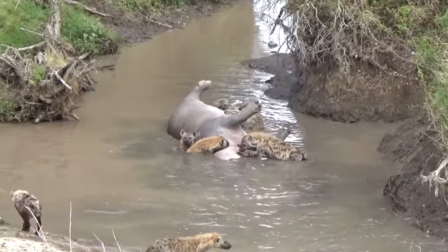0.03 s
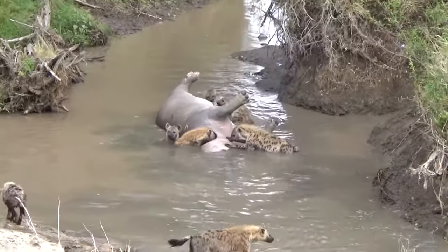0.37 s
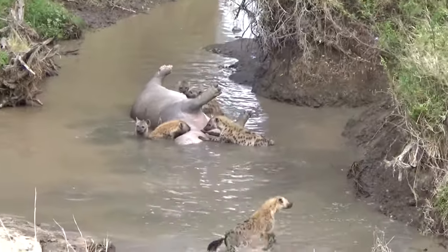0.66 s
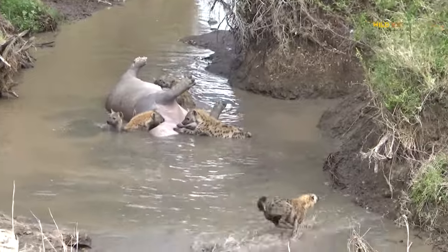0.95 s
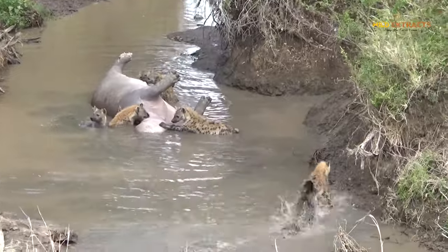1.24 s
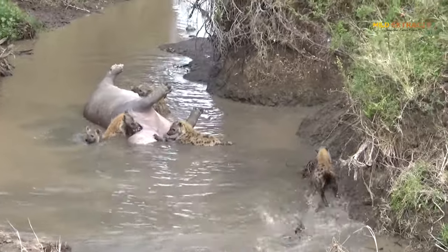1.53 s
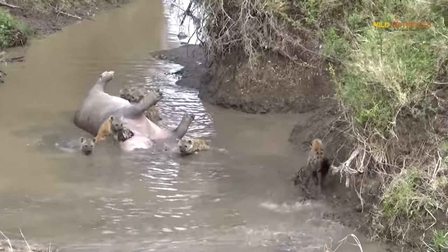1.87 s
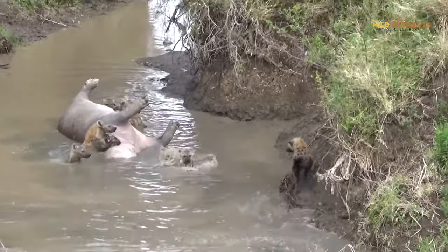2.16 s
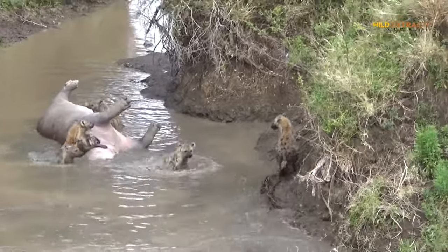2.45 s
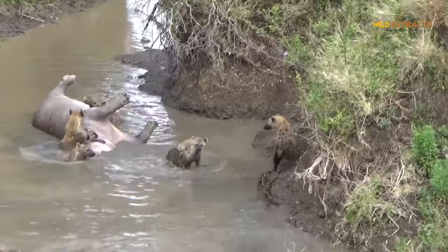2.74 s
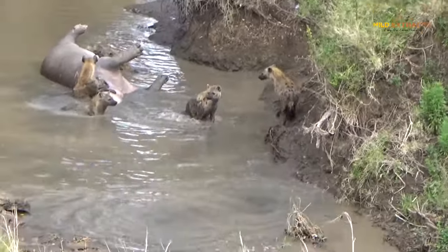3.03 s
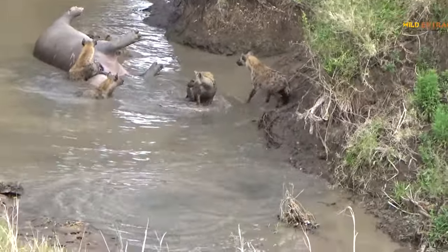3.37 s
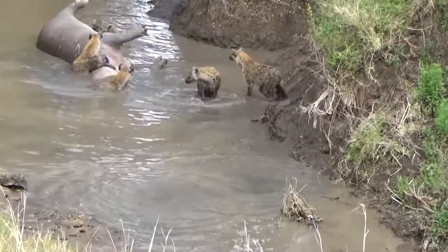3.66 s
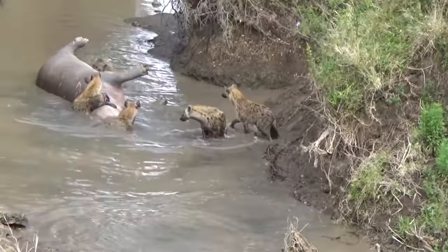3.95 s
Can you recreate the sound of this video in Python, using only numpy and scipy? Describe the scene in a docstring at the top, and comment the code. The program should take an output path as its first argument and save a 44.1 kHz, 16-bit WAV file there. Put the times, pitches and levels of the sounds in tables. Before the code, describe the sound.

Splashing, slaps and plops as an animal bounds through a shallow river near the microphone. Wind gusts rumble at first, then the water settles to softer sloshing, with faint birds over a quiet outdoor hush.

```python
"""A shallow muddy river between earth banks. Near the microphone a hyena bounds through: paws slap,
air pockets plop shut, each plunge stirs up bubbles and the thrown water patters back.
Others wade and slosh farther off; small birds whistle ahead and warble on the bank to the right.
Gusts buffet the microphone at first, then leave a quiet outdoor hush with a faint whine in it."""
import sys
import numpy as np
from scipy import signal
from scipy.fft import rfft, irfft, next_fast_len
from scipy.io import wavfile
from scipy.ndimage import uniform_filter1d, map_coordinates

SR = 44100
rng = np.random.default_rng(int(sys.argv[2]) if len(sys.argv) > 2 else 0)


def bounce(signal):
    """Save signal as a 16-bit WAV file at the path given by the first command-line argument."""
    frames = np.transpose(np.atleast_2d(signal))
    limited = np.clip(frames, -1, 1)
    pcm = np.round(limited * 32767).astype(np.int16)
    wavfile.write(sys.argv[1], SR, pcm)


N = 176400

# water stirred by wading legs: time_s, level_db
SLOSH_LEVEL = [(0, -39), (.35, -45), (.47, -33.5), (.6, -37.5), (.8, -35.5), (1.05, -34.5), (1.3, -37.5),
               (1.6, -37), (1.9, -35), (2.05, -37.5), (2.4, -37.5), (2.55, -38.5), (2.8, -37.5),
               (3.05, -45.5), (3.85, -46.5), (4, -40)]
# thrown water falling back: time_s, level_db
PATTER_LEVEL = [(0, -41), (.13, -40), (.3, -37), (.45, -33), (.61, -35.5), (.78, -29), (.85, -36),
                (1.06, -36.5), (1.3, -36.5), (1.42, -34.5), (1.56, -34.5), (1.66, -34), (1.8, -38),
                (2.0, -41.5), (2.7, -41.5), (2.95, -48), (3.35, -51.5), (4, -44.5)]
# colour of the slosh: frequency_hz, gain_db
SLOSH_TONE = [(120, -24), (330, -8), (580, -1.5), (1100, -1), (1700, -2), (2200, -5), (3200, -9),
              (6000, -17.5), (10000, -13.5), (15500, -30)]
# colour of the spray: frequency_hz, gain_db
SPRAY_TONE = [(500, -13), (1500, -7.5), (3000, -3.5), (5000, -3), (6500, -4), (8200, -1.5), (9600, 1),
              (10800, -3.5), (12000, -9.5), (15500, -24)]
# stereo image of the water: frequency_hz, left_right_correlation
WATER_IMAGE = [(200, 0.99), (1000, 0.94), (2500, 0.89), (6000, 0.92), (10000, 1)]


def splashing():
    """Each plunge swells the bubbling slosh and the fine spray above the stirred water."""
    # plunges and strides: peak_s, rise_s, fall_s, slosh_db, spray_db
    plunges = [(.434, .0015, .02, -32, -45), (.56, 0.011, 0.0064, -27, -48),
               (.639, .0012, 0.013, -26, -26.5), (.695, .008, .016, -28.5, -33),
               (.752, 0.028, 0.017, -26, -34), (.9, 0.011, 0.05, -35, -32),
               (1.086, 0.0027, 0.045, -34, -32.5), (1.187, 0.035, 0.038, -27.5, -30.5),
               (1.217, 0.015, 0.022, -26.5, -31), (1.41, 0.027, 0.034, -31, -33.5),
               (1.63, .01, 0.043, -44, -29.5), (1.824, 0.0045, 0.0063, -34, -42),
               (2.985, 0.0064, 0.021, -36, -58), (3.138, .003, 0.0058, -35.5, -57),
               (3.26, 0.007, .025, -36, -50), (3.74, 0.027, 0.019, -46, -44),
               (3.922, 0.006, 0.022, -39, -35)]
    slosh_power = amp(curve(SLOSH_LEVEL) + 0.97 * wobble(25.63)) ** 2
    spray_power = amp(curve(PATTER_LEVEL) + 1.47 * wobble(40.03)) ** 2
    for peak_s, rise_s, fall_s, slosh_db, spray_db in plunges:
        t = clock() - peak_s
        swell = np.exp(-np.where(t < 0, (t / rise_s) ** 2 / 2, np.abs(t / fall_s)))
        slosh_power += (amp(slosh_db) * swell) ** 2
        spray_power += (amp(spray_db) * swell) ** 2
    slosh = bubbles(411.6, 4960, cycles=4.43, spread_db=2.5, froth_db=8, count=3000, samples=1000)
    spray = bubbles(2190, 13750, cycles=3.3, spread_db=4.5, froth_db=6.5, count=9000, samples=160)
    return (np.sqrt(slosh_power) * stereo(slosh, SLOSH_TONE, WATER_IMAGE)
            + np.sqrt(spray_power) * stereo(spray, SPRAY_TONE, WATER_IMAGE))


def slaps():
    """Brief cracks where paws hit the surface, shorter ticks where heavy drops land."""
    # hits on the water: start_s, peak_db, centre_hz, decay_s
    hits = [(.147, -16, 9300, .0015), (.173, -16.5, 8550, .002), (.372, -20, 8500, .0015),
            (.433, -14, 2150, .003), (0.638, -10, 2160, .0025), (0.644, -11, 3600, .0025),
            (0.6445, -9.5, 8500, .0025), (1.382, -19, 5900, .001), (1.432, -16.5, 9000, .0012),
            (1.477, -21, 7300, .0008), (2.0857, -21, 9000, .0005), (2.1052, -18, 8600, .0004),
            (2.111, -22, 9000, .0008), (2.1306, -18, 10000, .0005), (2.2028, -22, 9500, .001),
            (3.916, -19, 9000, .001), (3.9213, -24, 7000, .004)]
    out, t = np.zeros(N), np.arange(SR // 40) / SR
    for start_s, peak_db, centre_hz, decay_s in hits:
        burst = rng.standard_normal(len(t)) * np.exp(-t / decay_s)
        edges_hz = centre_hz * np.exp([-0.25, 0.25])
        crack = signal.lfilter(*signal.butter(1, edges_hz, 'band', fs=SR), burst)
        crack = signal.lfilter(*signal.butter(4, 11500, fs=SR), crack)
        add(out, start_s, amp(peak_db) * crack / np.abs(crack).max())
    return out


def gulps():
    """Air pockets close behind the legs with a plop, the small ones with a short smack."""
    # closing pockets: start_s, level_db, pitch_hz, decay_cycles
    pockets = [(.433, -11.5, 2000, 2.3), (.6445, -7, 1290, 1.55), (1.081, -15.5, 566, 2),
               (1.174, -17, 930, 6.2), (1.918, -29, 480, 3.7), (2.385, -29, 670, 6.7), (2.72, -27, 587, 5),
               (2.777, -26, 602, 5.8), (3.258, -37, 1070, 3), (3.9005, -17, 1750, 2),
               (3.909, -16, 1600, 2.2)]
    out, t = np.zeros(N), np.arange(SR // 8) / SR
    for start_s, level_db, pitch_hz, cycles in pockets:
        add(out, start_s, amp(level_db) * bubble(t, pitch_hz, cycles, rise=0.07))
    return out


def lapping():
    """Sparse little bubbles and drips stand out of the stirred water."""
    laps = bubbles(500, 1700, cycles=5.1, spread_db=3.5, froth_db=-30, count=260, samples=1600)
    drips = bubbles(5500, 12000, cycles=2.9, spread_db=4, froth_db=-30, count=420, samples=200)
    return (amp(curve(SLOSH_LEVEL) - 8.5) * stereo(laps, SLOSH_TONE, WATER_IMAGE)
            + amp(curve(PATTER_LEVEL) - 11.5) * stereo(drips, SPRAY_TONE, WATER_IMAGE))


def bubble(t, hz, cycles, rise):
    """Trapped air rings and dies away, its pitch climbing by the share `rise` per decay time."""
    age = np.clip(t * hz / cycles, 0, 12)
    ring = np.sin(2 * np.pi * cycles * age * (1 + rise * age / 2))
    return ring * np.exp(-age) * (1 - np.exp(-age * cycles * 2))


def bubbles(lo_hz, hi_hz, cycles, spread_db, froth_db, count, samples):
    """A cloud of bubbles of random size and place over the noise of froth, as mid and side."""
    when, pitch, strength, pan = rng.random((count, 4)).T[:, :, None]
    hz = lo_hz * (hi_hz / lo_hz) ** pitch
    gain = amp(-spread_db * np.log(.015 + strength)) * hz
    rings = gain * bubble(np.arange(samples) / SR, hz, cycles, rise=0.054)
    at = ((when * N).astype(int) + np.arange(samples)).ravel()
    mid_side = [unit(np.bincount(at, (rings * weight).ravel(), N)[:N]) for weight in (1, 2 * pan - 1)]
    return np.array(mid_side) + amp(froth_db) * noise()


def wind():
    """Wind rumbles on the microphone; stronger gusts add a brighter flutter, single eddies thump."""
    # wind strength: time_s, level_db
    gusts = [(0, -21.5), (.04, -19.8), (.13, -19.8), (.2, -22.5), (.245, -27), (.28, -22), (.35, -23),
             (.43, -22.5), (.5, -27.5), (.57, -28), (.615, -38), (.65, -25), (.77, -26.5), (.88, -28.5),
             (1.06, -38), (1.12, -26), (1.19, -26), (1.24, -29.5), (1.37, -37), (1.46, -63), (1.51, -45),
             (1.57, -60), (1.86, -66), (1.96, -45), (2.02, -55), (2.15, -44), (2.25, -46), (2.3, -58),
             (2.36, -48), (2.43, -75), (4, -80)]
    # colour of the deep rumble: frequency_hz, gain_db
    rumble_tone = [(25, -37), (50, -16.5), (90, -4.5), (150, 1), (220, -2.5), (320, -15), (500, -35),
                   (1300, -50), (3000, -75)]
    # colour of the flutter: frequency_hz, gain_db
    flutter_tone = [(60, -39), (140, -4.5), (250, 3.5), (380, 1.5), (520, -5.5), (750, -13.5), (1200, -19),
                    (2000, -35), (4000, -64)]
    # stereo image of the wind: frequency_hz, left_right_correlation
    image = [(60, 0.88), (150, 0.78), (380, 0.076), (950, -0.13)]
    # eddies striking the microphone: centre_s, peak_db, pitch_hz
    eddies = [(.0398, -2, 310), (.055, -10, 350), (.063, -10, 300), (.098, -8, 230), (.1225, -14, 380),
              (.1385, -11, 190), (.263, -17, 420), (.288, -14, 290), (.661, -10.5, 235), (0.7576, -14, 206),
              (1.16, -17, 220), (1.191, -19, 220), (1.961, -24.5, 170), (1.985, -25, 180),
              (2.083, -30, 125), (2.128, -28, 140), (2.15, -30, 120), (2.227, -27, 160), (2.262, -34, 170),
              (2.359, -34, 180)]
    full_gust_db, thump_radians = -20.5, 2.3
    gust_db = curve(gusts) - full_gust_db + wobble(45.45)
    rumble_db = -23.5 + 0.79 * gust_db + 2.5 * wobble(24)  # comes in separate lumps
    out = amp(rumble_db) * stereo(noise(), rumble_tone, image)
    flutter_db = -19.5 + 1.65 * gust_db + 1.8 * wobble(90)
    out += amp(flutter_db) * stereo(noise(), flutter_tone, image)
    for centre_s, peak_db, pitch_hz in eddies:
        phase = 2 * np.pi * pitch_hz * (clock() - centre_s)
        push = np.sin(phase) * np.exp(-(phase / thump_radians) ** 2 / 2)
        out += amp(peak_db) * push / push.max()
    return out


def warbling_bird():
    """A bird sings one quick, swooping phrase twice, its harmonics shaped by the throat."""
    # course of the phrase: offset_s, pitch_hz, gain_db
    phrase = [(0, 2400, -14), (.02, 2620, 0), (.03, 2200, -1), (.05, 1500, -4), (.065, 1500, -25),
              (.1, 2250, -9), (.115, 1750, -3), (.13, 1250, -9), (.149, 2260, -1), (.16, 2020, -2),
              (.17, 1560, 2), (.182, 1300, -20), (.193, 2650, -5), (.204, 1720, 3), (.215, 1600, 3),
              (.222, 1700, -25), (.243, 2200, -9), (.261, 1700, -6), (.272, 1400, -8), (.286, 1430, -3),
              (.295, 1400, -25)]
    # each time it is sung: start_s, level_db
    entries = [(.954, -45.5), (2.522, -38.5)]
    # throat resonance: frequency_hz, gain_db
    throat = [(1200, -32), (2200, -2), (3000, 2.5), (4500, 5), (6000, 2), (8000, -20)]
    # first three harmonics, before the throat: gain_db
    harmonics = [-1, -.5, -10]
    offset_s, pitch_hz, gain_db = np.transpose(phrase)
    t = np.arange(int(offset_s[-1] * SR)) / SR
    hz = uniform_filter1d(np.interp(t, offset_s, pitch_hz), size=300)
    envelope = amp(np.interp(t, offset_s, gain_db)) * signal.get_window(('tukey', .02), len(t))
    out = np.zeros(N)
    for start_s, level_db in entries:
        waver = 1 + .022 * wobble(700)[:len(t)]
        phase = 2 * np.pi * np.cumsum(hz * waver) / SR
        voice = sum(amp(db + along(throat, k * hz)) * np.sin(k * phase)
                    for k, db in enumerate(harmonics, 1))
        flutter_db = 3.5 * wobble(300.4)[:len(t)]
        add(out, start_s, amp(level_db + flutter_db) * envelope * voice)
    return out


def whistling_bird():
    """A small bird gives thin falling whistles, slightly unsteady in pitch and level."""
    # whistles: start_s, length_s, start_hz, end_hz, level_db
    whistles = [(0.58, 0.018, 4480, 3980, -32), (0.807, 0.026, 4600, 3920, -30.5),
                (2.648, .014, 5500, 4600, -37), (3.832, .012, 3200, 3050, -40)]
    out = np.zeros(N)
    for start_s, length_s, start_hz, end_hz, level_db in whistles:
        progress = np.linspace(0, 1, int(length_s * SR))
        waver = 1 + 0.011 * wobble(690)[:len(progress)]
        hz = start_hz * (end_hz / start_hz) ** progress * waver
        flutter_db = 2.2 * wobble(325)[:len(progress)]
        envelope = amp(level_db + flutter_db) * np.abs(np.sin(np.pi * progress)) ** 0.32
        add(out, start_s, envelope * np.sin(2 * np.pi * np.cumsum(hz) / SR))
    return out


def hush():
    """Distant river and foliage blend into a steady, soft noise."""
    # colour of the hush: frequency_hz, gain_db
    tone = [(25, -38), (70, -28), (130, -17), (300, -7), (700, -3.5), (1500, -4.5), (2200, -3), (2700, -7),
            (3700, -13.5), (5300, -12.5), (6700, -16), (9700, -16), (12500, -24.5), (15500, -27)]
    # stereo image of the hush: frequency_hz, left_right_correlation
    image = [(150, 1), (1000, 0.74), (2400, 0.8), (6000, 0.46), (10000, 1)]
    return amp(-41.5 + 0.21 * wobble(5.68)) * stereo(noise(), tone, image)


def whine():
    """A faint, narrow band of ringing noise climbs slowly in the background."""
    # loudness of the whine: time_s, level_db
    level = [(0, -48), (.4, -44), (1.1, -43), (1.5, -51), (4, -49.5)]
    # its nearly mono image: frequency_hz, left_right_correlation
    image = [(2100, 0.99)]
    start_hz, half_width_hz, climb_hz_per_s = 2030, 105, 42
    band = filtered(noise(), lambda hz: 1 / (1 + ((hz - start_hz) / half_width_hz) ** 2))
    climbing = np.real(signal.hilbert(band) * np.exp(1j * np.pi * climb_hz_per_s * clock() ** 2))
    return amp(curve(level)) * stereo(climbing, [(start_hz, 0)], image)


def banks(x, t60_s, wet_db):
    """The earth banks scatter a short, weak answer after the direct sound."""
    t = np.arange(SR // 3) / SR
    tail = rng.standard_normal((2, len(t))) * amp(-60 * t / t60_s) * (t > .004)
    tail = signal.lfilter(*signal.butter(1, 5000, fs=SR), tail / np.linalg.norm(tail[0]))
    return x + amp(wet_db) * signal.fftconvolve(x[None], tail, axes=1)[:, :N]


def from_right(x, tilt_db=3.5, lead_s=4e-5):
    """Sound from the right reaches that side of the microphone earlier and louder."""
    side = np.array([[-1], [1]])
    return filtered(x, lambda hz: amp(side * tilt_db) * np.exp(1j * np.pi * hz * lead_s * side))


def stereo(pair, tone, image):
    """Colour two unrelated signals as mid and side and mix them to left and right, rms 1."""
    def response(hz):
        angle = np.arccos(np.clip(along(image, hz), -1, 1)) / 2
        return amp(along(tone, hz)) * np.array([np.cos(angle), np.sin(angle)])
    mid, side = filtered(pair, response)
    return unit(np.array([mid + side, mid - side]))


def amp(db):
    """Decibels to gain."""
    return 10 ** (np.asarray(db) / 20)


def unit(x):
    """Scale to rms 1."""
    return x / np.sqrt(np.mean(x ** 2) + 1e-20)


def clock():
    """Time of each sample in seconds."""
    return np.arange(N) / SR


def curve(rows):
    """Join (time_s, value) points into one value per sample."""
    return np.interp(clock(), *np.transpose(rows))


def along(points, hz):
    """Read (frequency_hz, value) points at hz, on a log axis."""
    knots_hz, values = np.transpose(points)
    return np.interp(np.log(hz + 1), np.log(knots_hz + 1), values)


def wobble(rate):
    """A smooth random curve with `rate` knots a second."""
    return map_coordinates(rng.standard_normal(int(N * rate / SR) + 4), [clock() * rate])


def filtered(x, response):
    """Multiply the spectrum of x by response(hz)."""
    size = next_fast_len(N + SR // 4)
    return irfft(rfft(x, size) * response(np.fft.rfftfreq(size, 1 / SR)), size)[..., :N]


def noise():
    """Two unrelated white noises."""
    return rng.standard_normal((2, N))


def add(out, start_s, sound):
    """Mix a short sound in at start_s."""
    part = out[max(round(start_s * SR), 0):][:len(sound)]
    part += sound[:len(part)]


def scene():
    """Water in front, birds ahead and to the right, wind on the microphone, hush in the distance."""
    water = splashing() + lapping() + banks(slaps() + gulps(), t60_s=0.25, wet_db=-9.5)
    warble = from_right(banks(warbling_bird(), t60_s=0.084, wet_db=-6))
    whistles = banks(whistling_bird(), t60_s=.13, wet_db=-4)
    return water + warble + whistles + wind() + hush() + whine()


def record(dry):
    """The recorder keeps nothing above its band limit."""
    return filtered(dry, lambda hz: hz < 15750)


dry = scene()
out = record(dry)
bounce(out)
```